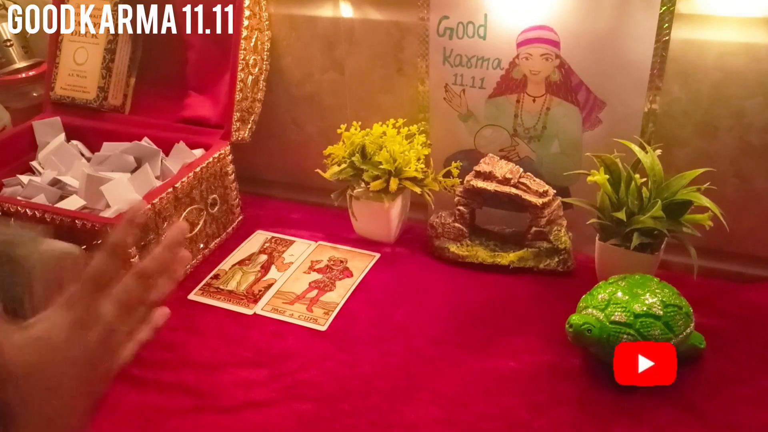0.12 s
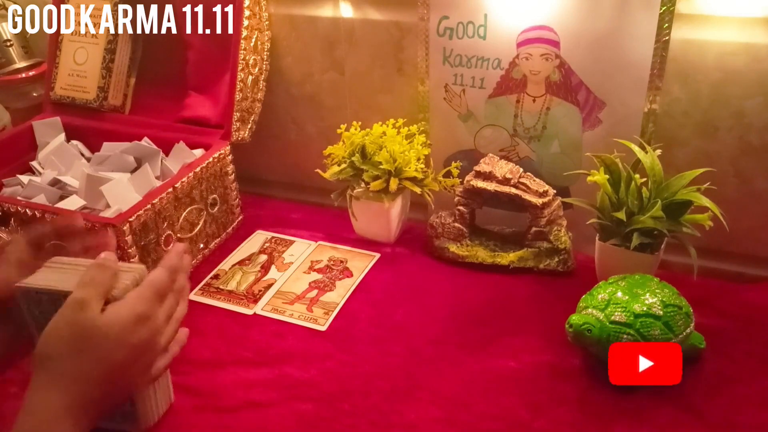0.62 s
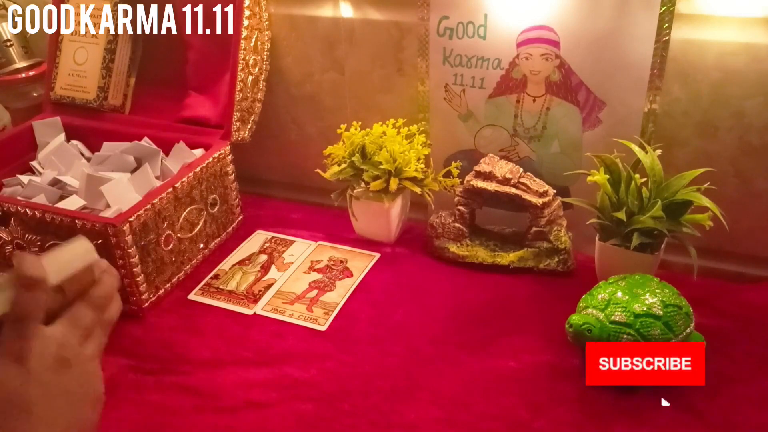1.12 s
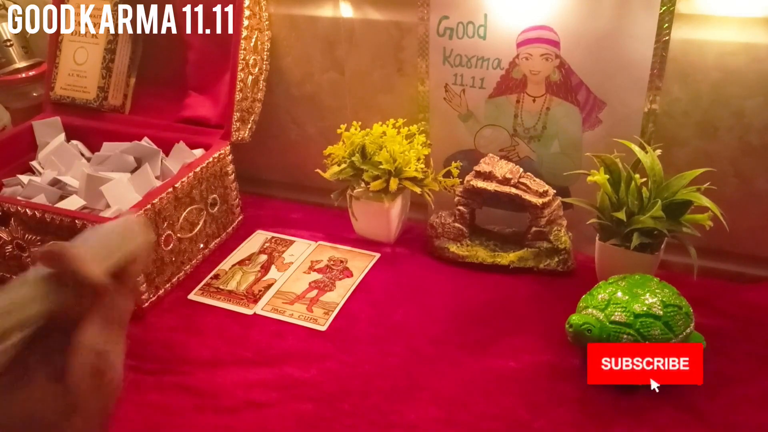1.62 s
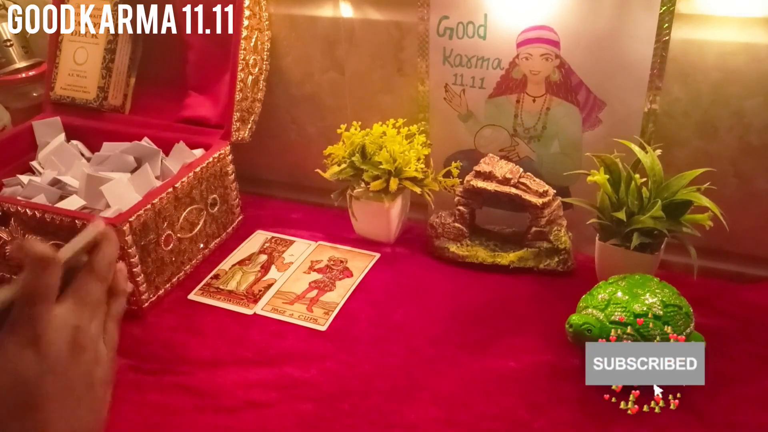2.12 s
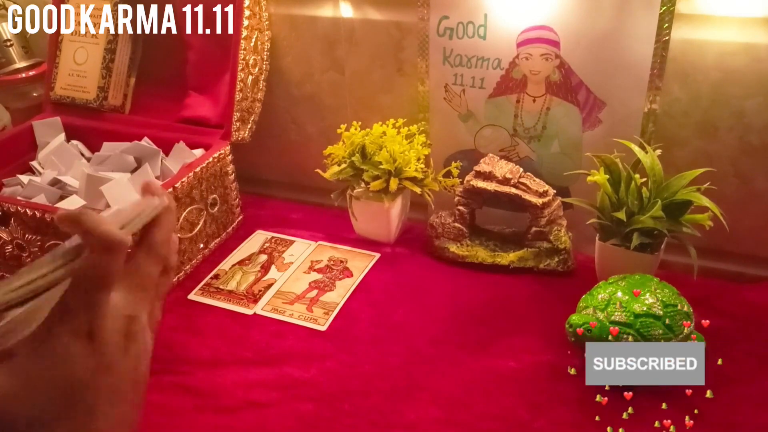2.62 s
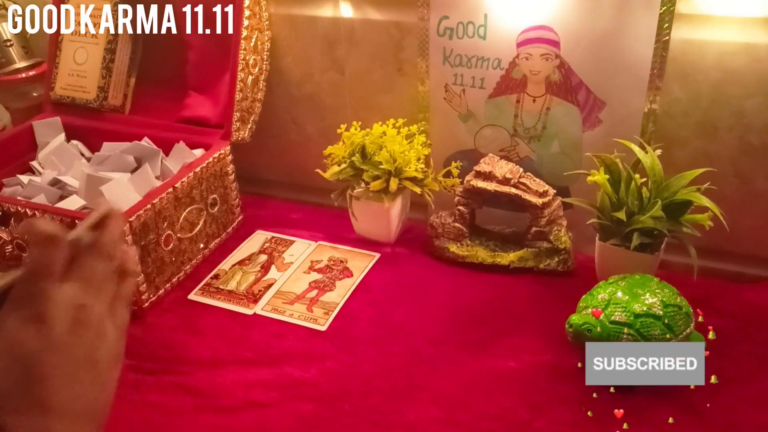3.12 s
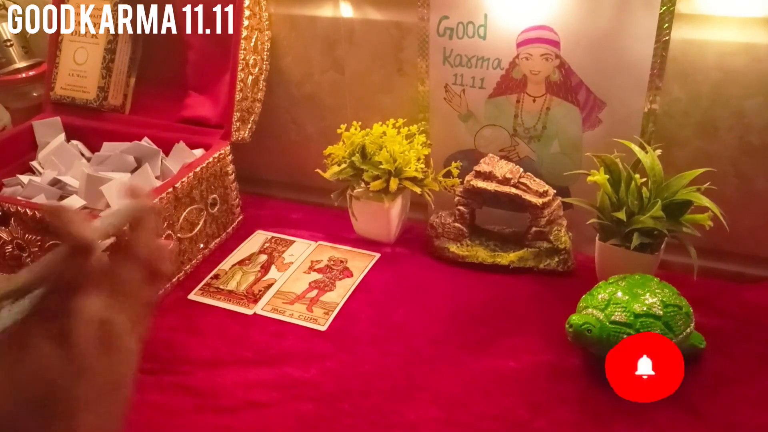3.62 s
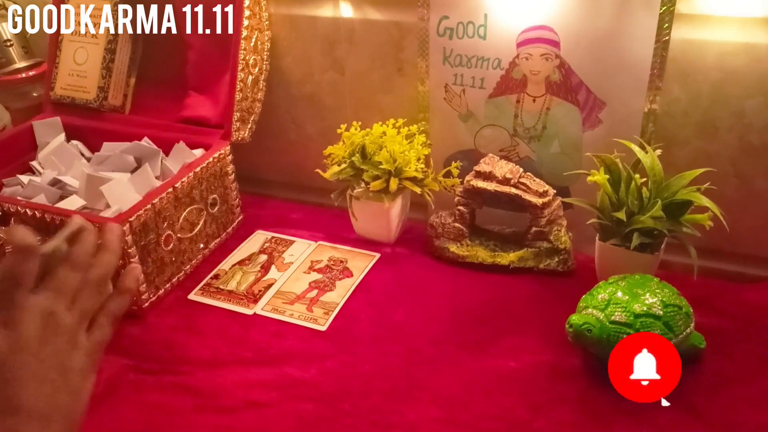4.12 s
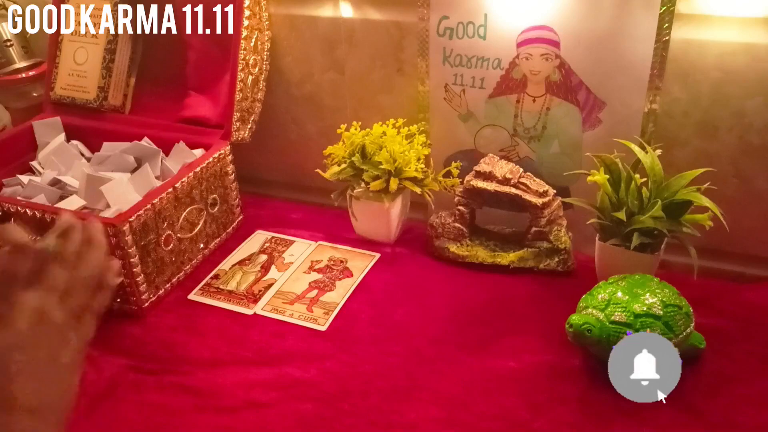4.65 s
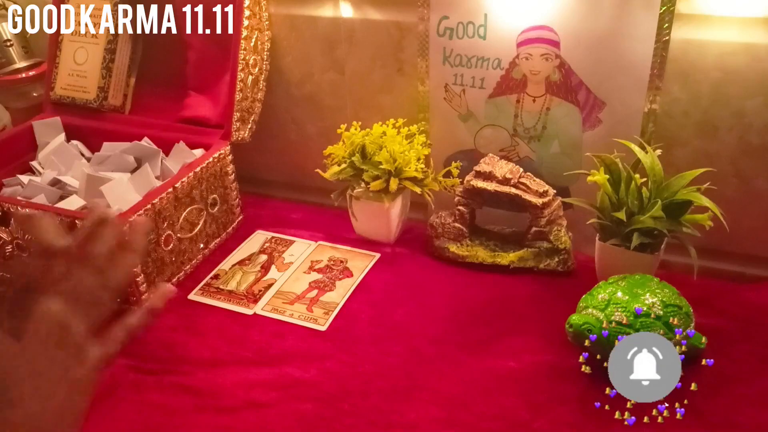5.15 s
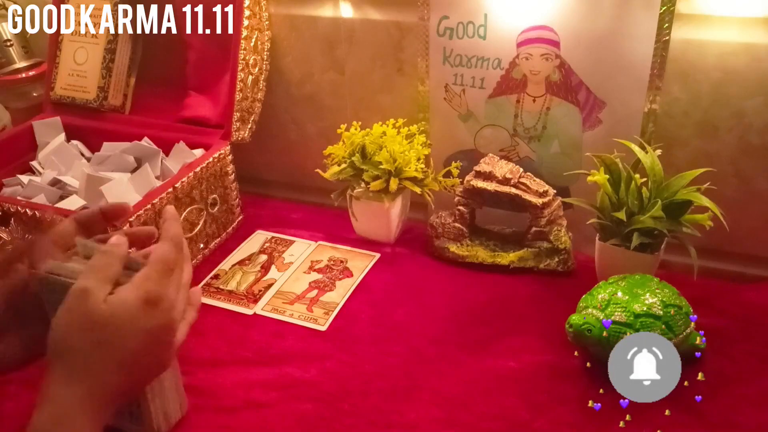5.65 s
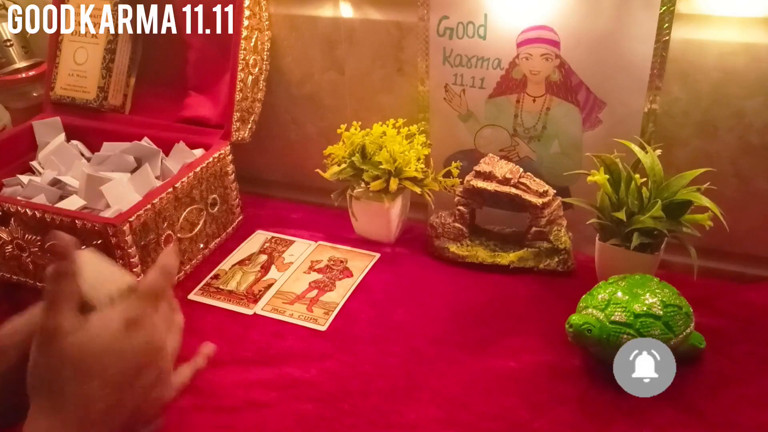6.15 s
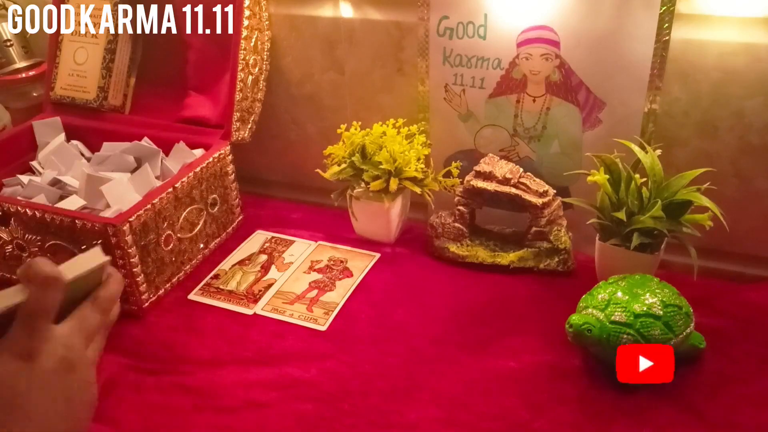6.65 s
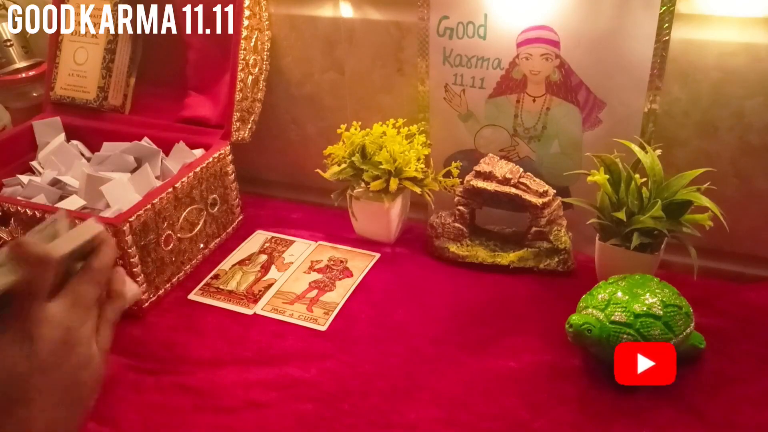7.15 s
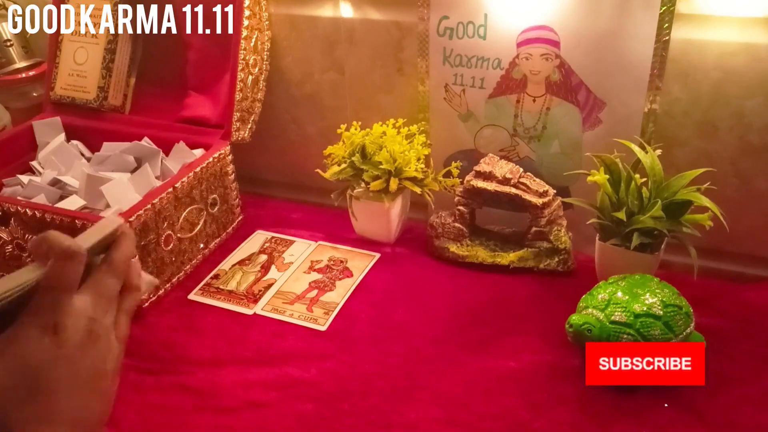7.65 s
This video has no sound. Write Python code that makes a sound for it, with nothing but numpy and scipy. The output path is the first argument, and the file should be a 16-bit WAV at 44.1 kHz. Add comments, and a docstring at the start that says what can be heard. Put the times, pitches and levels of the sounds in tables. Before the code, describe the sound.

Close to the microphone in a quiet small room, a deck of stiff cards is knocked on a padded table, then shuffled overhand about five strokes a second. Each stroke gives a gritty papery hiss, crisp edge snaps and a soft hollow drop into the palm. After a second, clickier knock and a faint pause, quick shuffling returns until the end.

```python
"""In a quiet room, close to a microphone, hands shuffle stiff cards overhand, about five strokes a second.
Packets slide off with a hiss of gritty friction noise, snap at their edges as short bursts, and drop
hollowly into the cupped hand as noise through a resonance. Twice the deck is knocked square on a
cloth-covered table, whose modes ring, the second time with a click made like the snaps.
Behind lie brushing, low rumbles, air noise and thin tones."""
import sys
import numpy as np
from scipy import signal
from scipy.fft import rfft, irfft, next_fast_len
from scipy.io import wavfile
from scipy.ndimage import uniform_filter1d

SR = 44100
rng = np.random.default_rng(int(sys.argv[2]) if len(sys.argv) > 2 else 0)


def wrap_up_sound(samples):
    """Save the sound to the file named by the first command line argument, as 16-bit audio."""
    columns = np.atleast_2d(samples).T
    # keep every value between -1 and 1, then stretch to whole-number steps
    tamed = np.clip(columns, -1, 1)
    steps = np.round(tamed * 32767).astype(np.int16)
    wavfile.write(sys.argv[1], SR, steps)


def nominal_scale(level):
    """Amplitude ratio for a level in decibels (scalar or array-like)."""
    x = np.asarray(level, float) / 20
    return 10 ** x


N = 342657

# Overhand strokes: the thumb grips a packet, then the deck pulls away from under it
# [grip_s, grip_db, drag_ms after the grip, delay_ms to the pull, pull_db]
STROKES = [(1.493, -46, 54, 72, -43), (1.727, -47.5, 50, 81, -45), (1.935, -44.5, 29, 77, -47),
           (2.136, -48.5, 115, 94, -53.5), (2.35, -46.5, 34, 76.4, -42.5), (2.535, -49.5, 63, 84, -44.5),
           (2.747, -49, 75, 68, -44.5), (2.926, -49.5, 118, 92, -43.5), (3.13, -45, 105, 76, -44.5),
           (3.341, -54.5, 26, 79, -45.5), (3.527, -51.5, 45, 94, -49), (3.749, -48.5, 39, 66.3, -40.5),
           (3.926, -49.5, 56, 86, -45.5), (4.135, -45, 27, 66, -40), (4.325, -46, 42, 81, -43),
           (4.51, -53, 35, 86, -50.5), (4.714, -55, 34, 74, -53.5), (4.903, -60, 206, 102, -53),
           (5.099, -52, 90, 84, -48.5), (5.323, -47.5, 29, 24, -46.5), (6.963, -51, 16.4, 128, -46.5),
           (7.13, -49.5, 87, 74, -42), (7.25, -50.5, 27, 63, -45), (7.437, -47.5, 46, 119, -46.5),
           (7.655, -47.5, 32, 84, -56)]
# Brightness of the hiss as the hands turn [time_s, tilt_db per 1.06 octaves about 7 kHz]
BRIGHTNESS = [(0, -3), (1.5, -1.5), (2.3, 1), (3.1, -1.5), (4.2, 2), (4.8, -0.5), (5.4, 1.5), (7, -2),
              (7.7, -3)]
# Spectrum of sliding friction [frequency_hz, relative density_db]
SLIDE_COLOUR = [(120, 7.5), (200, -2.5), (564, -2), (1060, -13), (1650, -7), (2120, -11), (2330, -15),
                (2590, -11.5), (3600, -7.5), (5770, -10.5), (8150, -6), (9780, -15.5), (15400, -18)]
# Faint brushing as the deck is turned and squared, one level curve per spell [time_s, level_db]
HANDLING = [
    [(0.0, -60), (0.016, -41), (0.116, -75.5), (0.256, -58), (0.442, -58), (0.462, -69.5), (0.658, -68),
     (0.686, -93), (0.82, -66.5), (0.866, -92), (0.89, -65), (0.97, -89), (1.296, -75), (1.332, -60),
     (1.35, -84), (1.46, -69)],
    [(5.42, -66.5), (5.566, -66), (5.576, -58), (5.59, -56.5), (5.74, -64.5), (5.75, -64), (5.778, -63.5),
     (6.25, -76.5), (6.274, -89), (6.71, -76), (6.728, -63.5), (6.756, -78), (6.912, -91), (6.964, -64.5),
     (6.996, -69), (7.07, -54)],
]
# Card edges that catch and let go, and at 5.577 s the click of the deck striking the table
# [burst_s, level_db, low-frequency fullness_db before its band shape]
CLICKS = [(1.4952, -37, -5.5), (1.5851, -33, -3), (1.7255, -39, 4), (1.9839, -40.5, 17),
          (2.1385, -32.5, -1), (2.212, -42, -5), (2.5366, -40.5, -2), (2.628, -41, -6), (2.7568, -39, 2),
          (2.929, -40, 3), (3.128, -37, -1), (3.144, -41, 8), (3.2179, -30, 4), (3.403, -47, 6),
          (3.5304, -38.5, -18), (3.543, -45, -4), (3.7395, -45.5, -2), (4.2156, -32, 2), (4.337, -46, 4),
          (4.4136, -32.5, 4), (4.511, -47.5, -16), (4.9056, -46, 5), (4.92, -49.5, 0), (5.101, -46.5, 13),
          (5.1239, -36, 17), (5.5773, -33.5, 29.5), (5.7486, -46.5, 0), (6.7321, -51, 3), (7.1697, -37, 6),
          (7.198, -28.5, -4.5), (7.3101, -39, 11), (7.33, -44, 6), (7.5293, -37, 8)]
# Packets landing in the hand [landing_s, level_db, hollow_hz of the space between the cards]
DROPS = [(0.006, -48.5, 970), (1.497, -47.5, 248), (1.583, -50, 221), (1.725, -57.5, 353),
         (1.831, -44.5, 540), (2.0198, -42.5, 487), (2.139, -51, 260), (2.24, -40.5, 480),
         (2.438, -43.5, 730), (2.638, -46, 570), (2.829, -50, 416), (3.014, -46.5, 804),
         (3.215, -39.5, 640), (3.423, -45, 550), (3.53, -56, 420), (3.654, -47, 620), (3.835, -38, 644),
         (4.019, -45, 600), (4.217, -34.5, 412), (4.412, -39.5, 670), (4.519, -56.5, 560),
         (4.808, -54, 640), (5.02, -44.5, 280), (5.125, -50.5, 600), (5.205, -47, 550), (5.342, -52, 358),
         (5.856, -50.5, 370), (7.198, -46.5, 222), (7.311, -72, 258), (7.442, -55.5, 506), (7.49, -54, 160),
         (7.572, -45, 534)]
# Gaps between cards that whistle softly as they slide [peak_s, level_db, half_length_ms, pitch_hz]
HUMS = [(2.335, -58, 46, 780), (2.58, -49.5, 37, 840), (2.831, -44, 6.6, 976), (3.02, -46, 9.2, 900),
        (4.387, -54.5, 59, 860), (5.218, -51.5, 28.6, 790), (7.725, -53.5, 14, 856)]
# The deck edge meets the table, cards settling one after another
# [peak_s, level_db, build_up_ms, settling_ms, softness_hz above which the contact force falls]
KNOCKS = [(.252, -29.5, 2.7, 40, 940), (5.578, -37.5, 1.43, 36, 2500), (5.612, -38.5, 18, 53, 900)]
# Table top, each row the centre of a close cluster of modes [frequency_hz, level_db, t60_s]
TABLE_MODES = [(116, -21, 0.59), (144.4, -5, 0.45), (278, 0.5, 0.067), (345, -4, 0.23), (420, 2.5, 0.074),
               (534, -1, 0.04), (722, 2.5, 0.054), (1212, -1, 0.051), (1646, -3, 0.081), (1723, -15, 0.065)]
# Arms and wrists stirring the table top, apart from the strokes [time_s, level_db]
STIR_LEVEL = [(0.0, -68), (0.45, -61), (0.62, -52), (0.72, -70), (1.45, -71), (3.6, -66.5), (5.0, -61.5),
              (6.0, -55.5), (6.3, -64.5), (6.9, -70.5), (7.5, -54), (7.77, -61.5)]
# Spectrum of the stirring, before a further cut above 400 Hz [frequency_hz, relative density_db]
STIR_COLOUR = [(50, -40), (105, 1.5), (145, -2.5), (200, -8), (400, -16)]
# A deep rumble that swells and sinks [time_s, level_db]
DEEP_LEVEL = [(.3, -49), (1.2, -69), (2.5, -82), (3.75, -52.5), (5.8, -56), (6.9, -58.5), (7.52, -39),
              (7.77, -54)]
# Spectrum of the room's air noise [frequency_hz, relative density_db]
AIR_COLOUR = [(18, -10), (30, -5), (100, -33), (368, -4), (654, -14), (1050, -8), (1320, -23), (1860, -17),
              (2410, -22.5), (6510, -29.5), (8230, -26), (9880, -36.5), (15400, -39)]
# Steady thin tones [frequency_hz, rms level_db]
WHINE = [(6821, -95.5), (8527, -82.5)]
# Reverberation time of the room [frequency_hz, t60_s]
ROOM_DECAY = [(100, 0.61), (2000, 0.29), (15000, 0.095)]
# Microphone response [frequency_hz, gain_db]
MICROPHONE = [(25, -52), (60, -7.5), (12000, 2), (15300, 9.5)]


def evened(x):
    """Normalization: scales a signal to unit rms."""
    return x / np.sqrt(np.mean(x ** 2) + 1e-20)


def read(points, hz):
    """Interpolation of a table along a logarithmic frequency axis."""
    f, value = np.transpose(points)
    return np.interp(np.log(hz + 1), np.log(f + 1), value)


def level_at(points, t):
    """Envelope: linear gain at times t from a curve interpolated in decibels."""
    return nominal_scale(np.interp(t, *np.transpose(points)))


def add(mix, start, sound):
    """Superposition: adds a sound at a sample position, trimmed to the mix."""
    part = mix[max(start, 0):][:len(sound) + min(start, 0)]
    part += sound[max(-start, 0):][:len(part)]


def coloured(x, db_at):
    """Spectral shaping: filters x by the curve db_at(Hz), then evens it."""
    hz = np.fft.rfftfreq(len(x), 1 / SR)
    return evened(irfft(rfft(x) * nominal_scale(db_at(hz)), len(x)))


def swell(rise_ms, fade_ms):
    """Gaussian envelope, flanks falling to 1/e in the given times (at least 1 ms); also its peak sample."""
    lead, tail = (round(2.5 * max(ms, 1) * SR / 1000) for ms in (rise_ms, fade_ms))
    u = np.r_[np.linspace(-2.5, 0, lead), np.linspace(0, 2.5, tail)]
    return lead, np.exp(-u ** 2)


def gritty(rows, grit_db, grain_size, ticks_per_s, tick):
    """Stick-slip friction: noise of strength varying over grain_size samples, with random slip ticks."""
    size = (rows, 2 * N)
    jumps = uniform_filter1d(rng.standard_normal(size), grain_size, axis=1)
    slips = (rng.random(size) < ticks_per_s / SR) * rng.exponential(1, size)
    slips = signal.lfilter([1], [1, -.96], slips, axis=1)  # each dies in about a millisecond
    strength = nominal_scale(grit_db * evened(jumps)) + tick * slips
    return rng.standard_normal(size) * strength


def brightened(hz, bright_db):
    """Spectral tilt: the slide colour turned about 7 kHz, within limits."""
    octaves = np.clip(np.log2(hz / 7000 + 1e-9), -1.3, 1)
    return read(SLIDE_COLOUR, hz) + bright_db * octaves / 1.06


def slides():
    """Sliding friction: gritty hiss at each grip and pull, unevenly coloured by the packet's flexing."""
    out = np.zeros(N)
    noise = gritty(2, grit_db=2.0, grain_size=60, ticks_per_s=73.0, tick=1.5)
    flex_db = 2.4 * rng.standard_normal((len(STROKES), 2, 40))
    flex_hz = np.geomspace(300, 16000, 40)
    for k, (grip_s, grip_db, drag_ms, delay_ms, pull_db) in enumerate(STROKES):
        bright_db = np.interp(grip_s, *np.transpose(BRIGHTNESS))
        snapped = min(abs(click[0] - grip_s) for click in CLICKS) < .007
        grip_rise_ms = 2.5 if snapped else 8.3  # a grip that opens with a snap starts faster
        grip = grip_s, grip_db, swell(grip_rise_ms, drag_ms)
        pull = grip_s + delay_ms / 1000, pull_db, swell(.28 * delay_ms, fade_ms=33.2)
        for j, (peak_s, db, (lead, shape)) in enumerate((grip, pull)):
            rub = noise[j, round(grip_s * SR):][:next_fast_len(len(shape))]
            hiss = coloured(rub, lambda hz: brightened(hz, bright_db) + np.interp(hz, flex_hz, flex_db[k, j]))
            add(out, round(peak_s * SR) - lead, nominal_scale(db) * hiss[:len(shape)] * shape)
    return out


def brushing():
    """Light friction: a faint, flickering hiss while the deck is turned and squared."""
    t, level = np.arange(N) / SR, np.zeros(N)
    for curve in HANDLING:
        level += level_at(curve, t) * (t >= curve[0][0]) * (t < curve[-1][0])
    flicker = evened(uniform_filter1d(rng.standard_normal(N), size=1100))
    level *= nominal_scale(3.2 * flicker)
    rub = gritty(1, grit_db=2.0, grain_size=200, ticks_per_s=22.0, tick=0.55)[0, :N]
    return level * coloured(rub, lambda hz: brightened(hz, bright_db=-1.5))


def clicks():
    """Sudden release or impact: card snaps and a table click as noise of steep onset, exponential decay."""
    out, t = np.zeros(N), np.arange(1024) / SR
    envelope = np.minimum(t / 0.000077, 1) * (np.exp(-t / 0.0045) + 0.27 * np.exp(-t / 0.0016))
    for s, db, full_db in CLICKS:
        def colour(hz):
            fullness = 1 / (1 + (hz / 3200.0) ** 4) * hz ** 2 / (hz ** 2 + 260.0 ** 2)
            return brightened(hz, bright_db=-1) + full_db * fullness
        crack = coloured(rng.standard_normal(1024), colour) * envelope
        crack /= np.sqrt(np.mean(crack[:88] ** 2))  # level is that of the first 2 ms
        add(out, round((s - .0006) * SR), nominal_scale(db) * crack)
    return out


def puffs(rows, width_hz, thump_share):
    """Cavity resonance: air squeezed between cards rings at the hollow's pitch over a broad low thump."""
    out = np.zeros(N)
    noise = gritty(2, grit_db=0.0, grain_size=150, ticks_per_s=0, tick=0)
    for k, (s, db, rise_ms, fade_ms, hollow_hz) in enumerate(rows):
        def colour(hz):
            ring = 1 / (1 + ((hz - hollow_hz) / width_hz) ** 2) ** 2
            thump = (hz / 90.0) ** 2 / (1 + (hz / 150.0) ** 2) / (1 + (hz / 683.0) ** 6)
            return 10 * np.log10(ring + thump_share * thump)
        lead, shape = swell(rise_ms, fade_ms)
        air = noise[k % 2, round(s * SR):][:next_fast_len(len(shape) + 2000)]
        puff = coloured(air, colour)[:len(shape)] * shape
        puff /= np.sqrt(np.mean(puff ** 2) / np.mean(shape ** 2))
        add(out, round(s * SR) - lead, nominal_scale(db) * puff)
    return out


def drops():
    """Impact on a cavity: each packet makes a short, wide, higher first contact and a longer landing."""
    hardest_db = max(db for s, db, hz in DROPS)
    # softer landings settle more slowly, by 1.62 ms per dB
    landings = [(s, db, 4., 18.9 + 1.62 * (hardest_db - db), hz) for s, db, hz in DROPS]
    taps = [(s, db + 3.5, 1.494, 4.8, hz * 1.15) for s, db, hz in DROPS]
    return puffs(landings, width_hz=79.0, thump_share=0.13) + puffs(taps, width_hz=400.0, thump_share=0.087)


def hums():
    """Narrow resonance: a sliding gap between cards whistles softly."""
    rows = [(s, db, ms, ms, hz) for s, db, ms, hz in HUMS]
    return puffs(rows, width_hz=45.0, thump_share=0.0014)


def knocks():
    """Modal excitation: a rattle of contacts rings the table; harder contacts reach higher modes."""
    out, t = np.zeros(N), np.arange(SR // 2) / SR
    ring = np.zeros(len(t))
    for hz, db, t60 in TABLE_MODES:
        detune = 1 + .035 * rng.uniform(-1, 1, (5, 1))  # close neighbours beat and roughen the ring
        ring += nominal_scale(db - 60 * t / t60) * np.sin(2 * np.pi * hz * detune * t).sum(0)
    ring += 1.95 * nominal_scale(-60 * t / 0.2) * rng.standard_normal(len(t))  # dull, unpitched part of the blow
    noise = gritty(len(KNOCKS), grit_db=5.5, grain_size=130, ticks_per_s=0, tick=0)[:, :8192]
    for row, (s, db, rise_ms, fade_ms, soft_hz) in zip(noise, KNOCKS):
        lead, shape = swell(rise_ms, fade_ms)
        force = coloured(row, lambda hz: -10 * np.log10(1 + (hz / soft_hz) ** 4))
        thud = signal.fftconvolve(force[:len(shape)] * shape, ring)
        thud /= np.std(thud[lead:][:2205])  # level is that of 50 ms from the peak
        add(out, round(s * SR) - lead, nominal_scale(db) * thud)
    return out


def room(x):
    """Reverberation: sparse echoes of random sign, each band decaying at its own rate."""
    taps, at = np.zeros(SR), np.arange(200, SR - 20, 20)
    taps[at + rng.integers(0, 20, len(at))] = rng.choice([-1., 1.], len(at))
    hz, t, z = signal.stft(taps, SR, nperseg=256)
    decay = nominal_scale(-60 * t / read(ROOM_DECAY, hz)[:, None])
    tail = signal.istft(z * decay, SR, nperseg=256)[1]
    return signal.fftconvolve(x, tail / np.linalg.norm(tail))[:N]


def stir(cards):
    """Structure-borne noise: low rumble from the arms, swelling with the short-time rms of the cards."""
    stroke = np.sqrt(abs(uniform_filter1d(cards ** 2, size=1800)))
    level = level_at(STIR_LEVEL, np.arange(N) / SR) + 0.29 * stroke
    return level * coloured(rng.standard_normal(N), lambda hz: read(STIR_COLOUR, hz) - 40 * (hz > 400))


def deep():
    """Narrow-band noise: a hump at 49 Hz with slopes of 30 dB per octave."""
    rumble = coloured(rng.standard_normal(N), lambda hz: -30. * abs(np.log2(hz / 49.0 + 1e-9)))
    return level_at(DEEP_LEVEL, np.arange(N) / SR) * rumble


def room_tone():
    """Broadband noise: hiss and murmur of air whose level drifts in time-frequency patches."""
    air = coloured(rng.standard_normal(N), lambda hz: read(AIR_COLOUR, hz))
    z = signal.stft(air, nperseg=512)[2]
    patches = uniform_filter1d(rng.standard_normal(z.shape), size=90, axis=0)
    patches = uniform_filter1d(patches, size=5, axis=1)
    drifting = signal.istft(z * nominal_scale(1.5 * evened(patches)), nperseg=512)[1][:N]
    return nominal_scale(-68.5) * drifting


def whine():
    """Pure tones: steady, thin electrical sines of random phase."""
    t, out = np.arange(N) / SR, np.zeros(N)
    for hz, db in WHINE:
        out += np.sqrt(2) * nominal_scale(db) * np.sin(2 * np.pi * (hz * t + rng.random()))
    return out


def scene():
    """Superposition at one microphone: cards, table and room in both channels alike."""
    cards = slides() + brushing() + clicks()
    landing = drops() + hums()
    table = knocks()
    echo = room(nominal_scale(-11.5) * cards + nominal_scale(-16.5) * landing + nominal_scale(-10.0) * table)
    background = stir(cards + landing) + deep() + room_tone() + whine()
    mono = cards + landing + table + echo + background
    return np.array([mono, mono])


def roll_off(x):
    """The treble ends steeply here."""
    return signal.sosfilt(signal.butter(12, 16800, fs=SR, output="sos"), x)


def record(dry):
    """Linear filtering: the microphone's response, then a low-pass at 15520 Hz."""
    response = nominal_scale(read(MICROPHONE, np.fft.rfftfreq(N, 1 / SR)))
    heard = irfft(rfft(dry) * response, N)
    low_pass = signal.firwin(1023, 15520, window=("kaiser", 4), fs=SR)
    mix = signal.oaconvolve(heard, low_pass[None], "same")
    return roll_off(mix)


dry = scene()
out = record(dry)
wrap_up_sound(out)
```